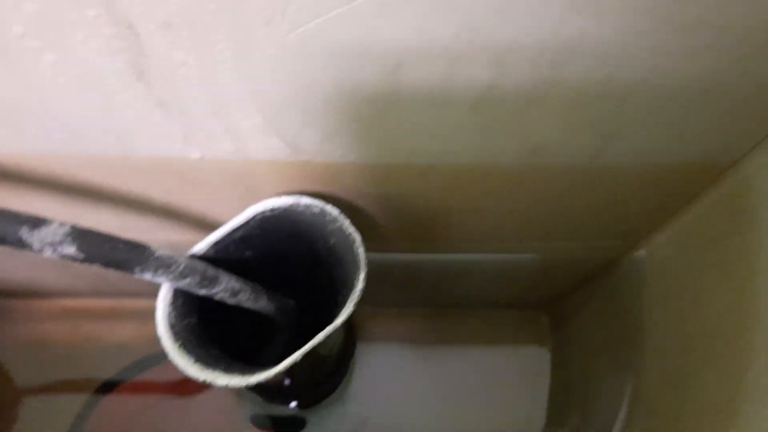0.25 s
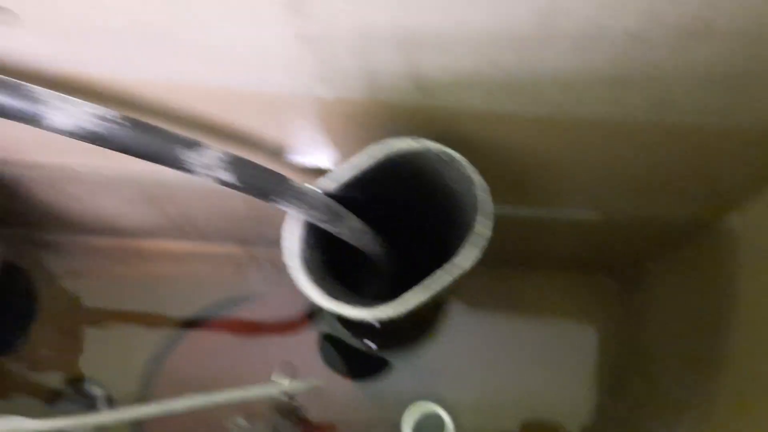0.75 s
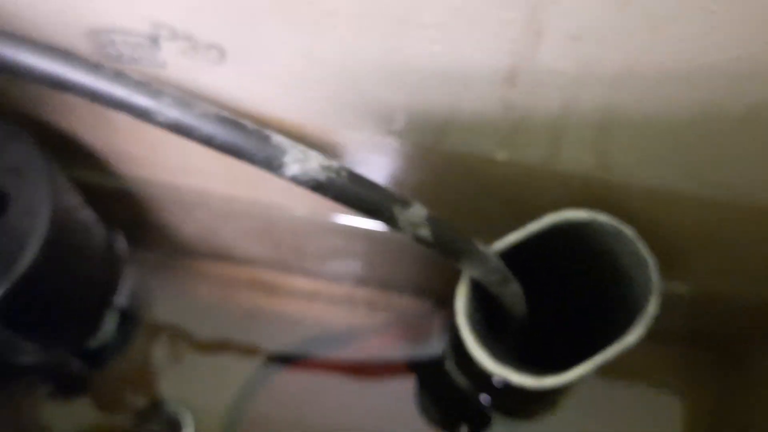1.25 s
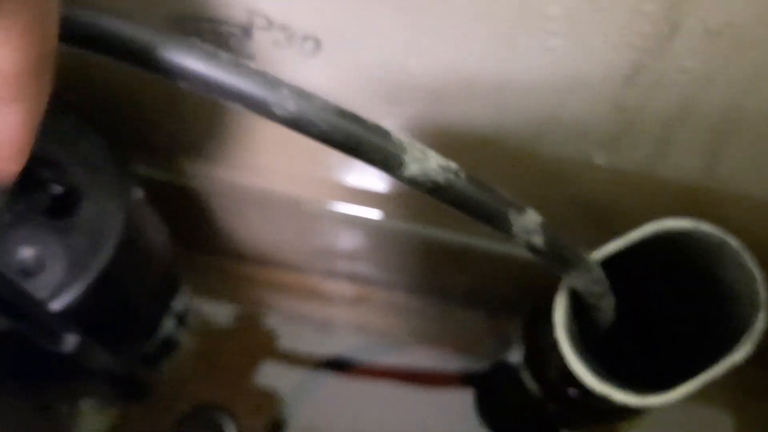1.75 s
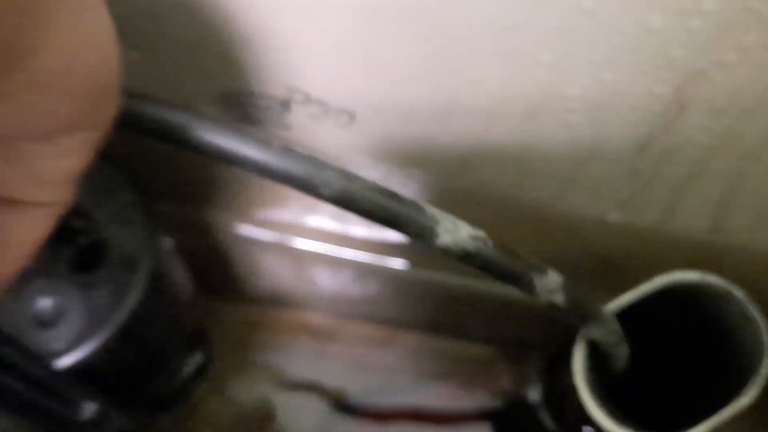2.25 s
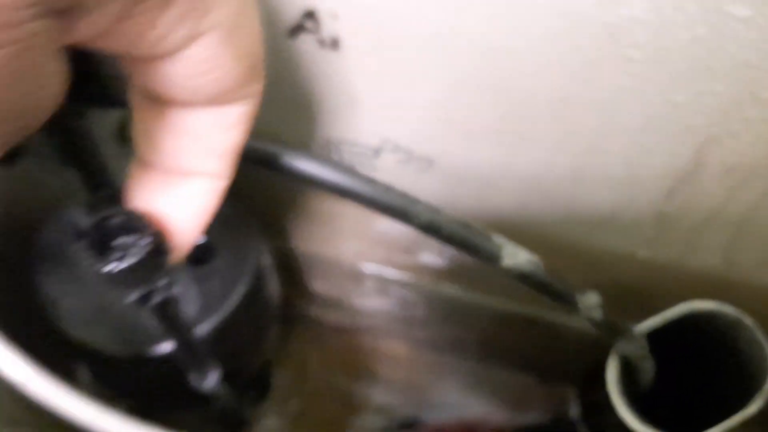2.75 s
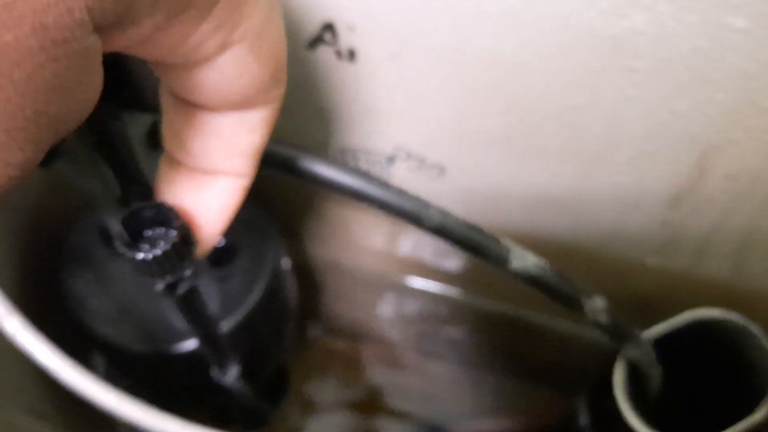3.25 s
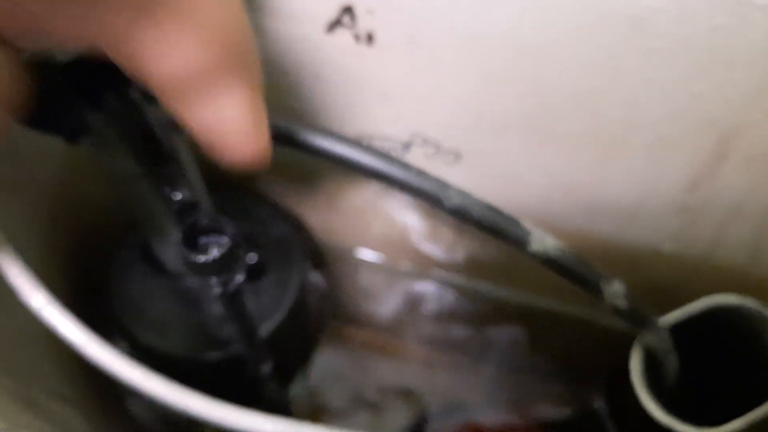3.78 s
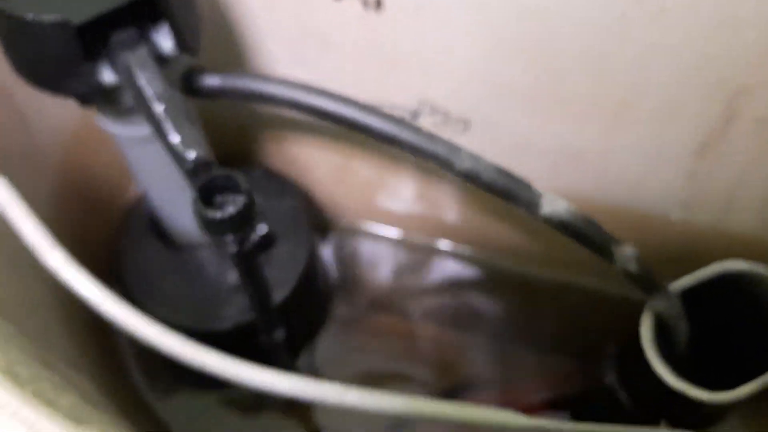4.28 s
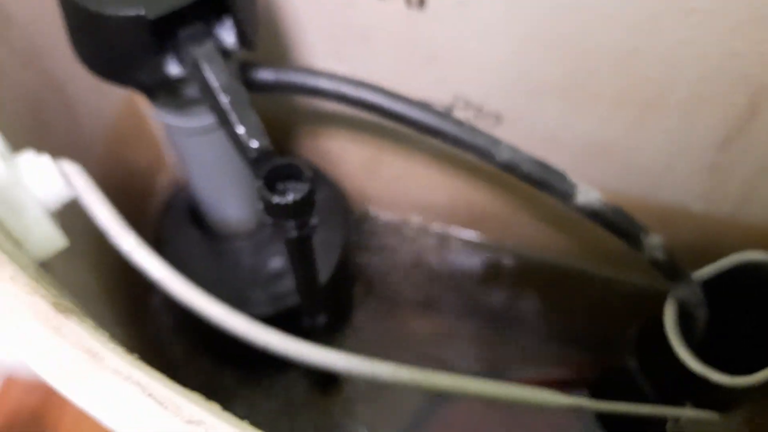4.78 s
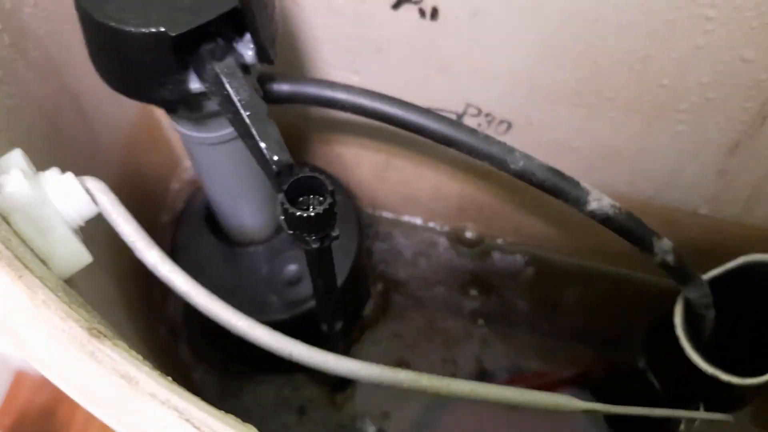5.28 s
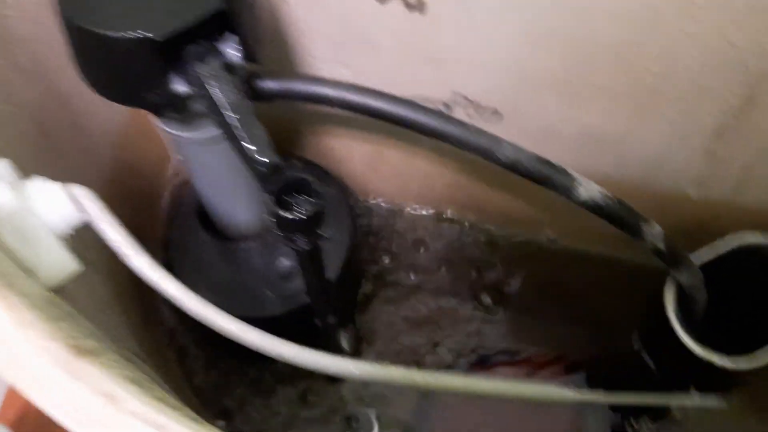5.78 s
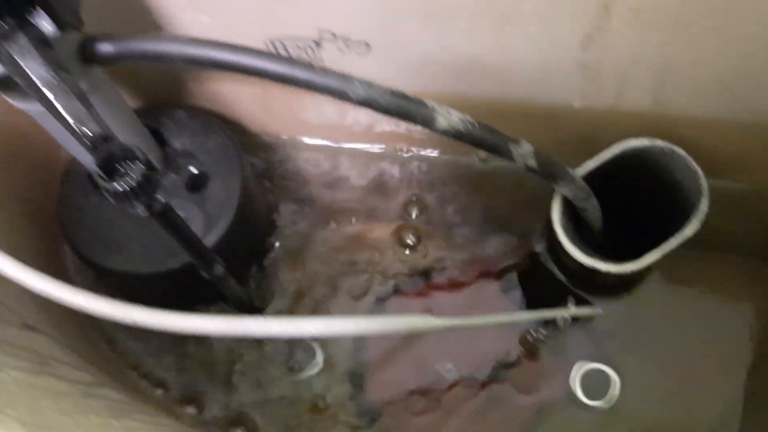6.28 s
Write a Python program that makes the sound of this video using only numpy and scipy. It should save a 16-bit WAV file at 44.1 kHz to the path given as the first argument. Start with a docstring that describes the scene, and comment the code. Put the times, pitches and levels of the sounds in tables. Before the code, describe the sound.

Close inside a refilling toilet cistern: steady rush, finger bumps, valve rasping shut, sparse plinks, then a spit, knocks and a stronger bubbling rush.

```python
"""A small bathroom, an open toilet tank refilling, a two-port hand-held microphone just above the water.
The fill valve hisses and spits as shaped noise; its jet churns bubbles that ring the air modes of the tank.
A finger brushes the left port as pressure snaps and rubbed noise. Then a hand lifts the float: the valve
sings in narrow noise bands, shuts and drips as short decaying tones, and on release it spurts, glugs
and rushes on more strongly."""
import sys
import numpy as np
from scipy import signal
from scipy.fft import rfft, irfft
from scipy.io import wavfile
from scipy.ndimage import uniform_filter1d, minimum_filter1d, map_coordinates

SR = 44100
rng = np.random.default_rng(int(sys.argv[2]) if len(sys.argv) > 2 else 0)


def store_pcm(level_fs):
    """Save levels as 16-bit WAV."""
    pcm = np.round(np.clip(level_fs, -1, 1) * 32767).astype(np.int16)
    wavfile.write(sys.argv[1], SR, np.atleast_2d(pcm).T)


N = 287973
TIME = np.arange(N) / SR
FREQ = np.maximum(np.arange(N // 2 + 1) * SR / N, 1)
# Levels in the tables are relative: the functions that play them may add trims.


def undb(db):
    """Decibels to gain."""
    return 10 ** (np.asarray(db) / 20)


def shape(x, response):
    """Filter by a frequency response."""
    return irfft(rfft(x) * response, N)


def unit(x, lo=1, hi=SR):
    """Scale so that the band from lo to hi [Hz] has rms 1."""
    return x / shape(x, (FREQ >= lo) & (FREQ <= hi)).std()


def low_cut(hz, order):
    """Response that fades below hz."""
    return 1 / (1 + (hz / FREQ) ** order)


def high_cut(hz, order):
    """Response that fades above hz."""
    return 1 / (1 + (FREQ / hz) ** order)


def detuning(hz, width):
    """Distance from a mode's centre, in half widths."""
    return (FREQ / hz - hz / FREQ) * hz / width


def resonance(hz, width):
    """Response of one damped mode."""
    return 1 / (1 + 1j * detuning(hz, width))


def body(modes, port=0):
    """Modes add in power; port scales the optional fourth column, positive for the left port."""
    power = 0
    for hz, width, db, *lean in modes:
        power = power + undb(2 * db + port * sum(lean)) / (1 + detuning(hz, width) ** 2)
    return np.sqrt(power)


def add(out, s, sound):
    """Mix a short sound in at time s."""
    i = int(np.clip(s * SR, 0, N - 1))
    out[..., i:i + sound.shape[-1]] += sound[..., :N - i]


def follow(curve, column=1):
    """Read one column of a timed curve at every sample."""
    columns = np.transpose(curve)
    return np.interp(TIME, columns[0], columns[column])


def walk(rate):
    """Slow random wander around 0, drawn afresh rate times a second, with spread near 0.36."""
    hold = max(int(SR / rate), 1)
    steps = np.repeat(rng.standard_normal(N // hold + 1), hold)
    return 0.44 * uniform_filter1d(steps, hold)[:N]


def noise():
    """Unrelated noise for the two ports."""
    return rng.standard_normal((2, N))


def ports(x, apart_hz=900):
    """Long waves reach both ports alike, short ones unrelated."""
    apart = np.minimum(FREQ / apart_hz, 1) ** 1.17
    side = shape(x[1], apart)
    return shape(x[0], np.sqrt(2 - apart ** 2)) + np.array([side, -side])


def bubble(hz, cycles, glide):
    """A bubble decays by 1/e in some cycles; its pitch climbs as it nears the surface."""
    age = np.arange(int(5 * cycles / hz * SR) + 2) * hz / SR / cycles
    return np.exp(-age) * np.sin(2 * np.pi * cycles * (age + glide * age ** 2 / 2))


def bubbles(lo_hz, hi_hz, cycles, spread_db, count, glide=0.028):
    """A swarm of bubbles of all sizes, each at its own place."""
    out = np.zeros((2, N))
    for when, size, loud, place in rng.random((count, 4)):
        gain = undb(-spread_db * np.log(.02 + .98 * loud))
        ears = np.array([[np.cos(2 * np.pi * place)], [np.sin(2 * np.pi * place)]])
        hz = lo_hz * (hi_hz / lo_hz) ** size
        add(out, when * N / SR, gain * ears * bubble(hz, cycles, glide))
    return unit(out)


def bursts(rows, source):
    """Short swells of band noise that peak a quarter of the way in and fall slowly."""
    out = np.zeros_like(source)
    for s, length, db, hz, width in rows:
        age = np.maximum(TIME - s, 0) / (length / 4)
        band = unit(shape(source, np.abs(resonance(hz, width)) ** 2))
        out += undb(db) * age * np.exp(1 - age) * band
    return out


def swell(start, end, rise_db_per_s, fall_db_per_s):
    """Gain that rises to 1 at start, holds until end and dies away."""
    before, after = np.maximum(start - TIME, 0), np.maximum(TIME - end, 0)
    return undb(-rise_db_per_s * before - fall_db_per_s * after)


def gliding(curve, width_hz):
    """A noisy resonance whose level and centre follow a curve."""
    turn = 2 * np.pi * np.cumsum(follow(curve, 2)) / SR
    a, b = (shape(noise(), high_cut(width_hz / 2, 4)) for _ in range(2))
    band = unit(a * np.cos(turn) + b * np.sin(turn))
    return band * undb(follow(curve)) * swell(curve[0][0], curve[-1][0], 300, 300)


def drift(x, share=0.00895, rate=5):
    """Resonances wander a little in pitch as the hand-held microphone moves."""
    at = np.cumsum(1 + share * walk(rate))
    return np.array([map_coordinates(ear, [at], order=3, mode="mirror") for ear in x])


def walls(x, t60=0.16, wet_db=-5):
    """Close porcelain walls scatter each small sound into a short decaying tail."""
    t = TIME[:SR // 3]
    tail = rng.standard_normal((2, len(t))) * undb(-60 * t / t60)
    tail *= undb(wet_db) / np.sqrt(np.sum(tail[0] ** 2))
    return x + signal.fftconvolve(x, tail, axes=1)[:, :N]


def settle(db, fall_db_per_s):
    """Water follows a rising drive at once, but calms only at its own pace."""
    calming = fall_db_per_s * TIME
    return np.maximum.accumulate(db + calming) - calming


# Flow: the valve runs, shuts to a dwindling leak, reopens part way, then fully: (time [s], level [dB])
VALVE_FLOW = [(0, -36.5), (0.9, -36), (2.05, -35), (2.35, -33), (2.73, -34.5), (2.80, -46), (2.87, -54),
              (3.48, -72.5), (3.54, -56), (3.585, -49), (3.61, -40), (3.68, -42.5), (3.74, -37.5),
              (3.82, -37), (3.92, -30.5), (4.7, -31), (6.5, -32.5)]
# How hard the jet stirs the water, relative to the flow: (time [s], level [dB])
JET_STIR = [(0, -3.5), (0.7, -3), (1.05, -8.5), (2.05, -7.5), (2.55, -4.5), (3.62, 0), (3.85, -3.5),
            (3.97, -1), (4.4, -0.5), (5.1, 2), (5.5, -3), (6.5, -3.5)]


def water_levels(churn_fall_db_per_s=59, slosh_fall_db_per_s=16, slosh_per_stir=0.99):
    """Levels [dB] of jet, churning and slosh, driven by the flow; churning calms fast, deep slosh slowly."""
    flow, stir = follow(VALVE_FLOW), follow(JET_STIR)
    churn = settle(flow + stir, churn_fall_db_per_s)
    slosh = settle(flow + slosh_per_stir * stir, slosh_fall_db_per_s)
    return flow, churn, slosh


# Resonances of the valve's hiss, before and after the handover: (centre [Hz], width [Hz], level [dB])
FIRST_HISS_MODES = [(3130, 630, -4), (3910, 130, -2.5), (4650, 130, -5.5), (5280, 220, -2),
                    (6280, 320, -0.5), (7000, 480, -4), (7870, 490, 0), (8750, 230, -0.5),
                    (10610, 560, -3.5), (11850, 560, 0), (12840, 800, -0.5), (14400, 710, 0),
                    (15040, 810, 3)]
SECOND_HISS_MODES = [(2810, 770, 1), (3610, 390, -1), (4660, 370, -5.5), (5680, 1900, -3.5),
                     (6740, 750, -2.5), (7930, 630, -2.5), (8760, 230, -1), (10820, 570, -6),
                     (12060, 540, -3), (12760, 680, 1), (14300, 990, -3.5), (14970, 1240, 0.5)]


def spray(modes, crackle_db, flutter_db, tilt_db, count):
    """The valve's jet: hiss that flutters and crackles, shaped by the valve's passages and near walls."""
    snaps = np.zeros(N)
    when, size = rng.random((count, 2)).T
    snaps[(when * N).astype(int)] = (.01 + size) ** -.9
    burst = signal.lfilter([1], [1, -np.exp(-1 / (0.00058 * SR))], snaps)  # each snap decays in 0.58 ms
    crackle = shape(noise() * np.sqrt(burst / burst.mean()), np.minimum(FREQ / 12000, 1) ** 0.3)
    jet = walls(noise() + undb(crackle_db) * crackle, t60=.09, wet_db=-6)
    # the top octave beams toward the right port
    beam = undb(np.array([[-.5], [.5]]) * tilt_db * np.minimum(FREQ / 13000, 1) ** 2)
    fluttering = jet * undb(flutter_db * walk(45))
    hiss = shape(fluttering, body(modes) * beam * low_cut(1800, 6))
    return unit(drift(hiss, share=.015), 5000, 15500)


# Lowest air modes of the tank: (centre [Hz], width [Hz], level [dB])
CAVITY_MODES = [(234.4, 9, -9), (267.8, 5.9, -6), (299.9, 5.2, -2), (321, 19, -4), (324.5, 24, -8),
                (367.3, 5.4, 4.5)]
# Higher air modes, before and after the handover:
# (centre [Hz], width [Hz], level [dB], lean to the left port [dB, scaled by the port factor])
FIRST_AIR_MODES = [(454, 9.3, -3.5, 23), (524, 5.8, -3, -7), (547, 8.4, -9, -8), (585, 28, -5, 18),
                   (651.6, 19, -3.5, -11), (725, 150, -17.5, 5), (900, 37, -7, 8), (965, 8.4, 4, 0),
                   (1070, 8.3, -16, -17), (1163, 42, -6.5, -3.5), (1272, 18, -3, 16.5),
                   (1325, 110, -10.5, -7.5), (1695, 144, -4, 7), (1625, 35, -4.5, -12.5),
                   (1945, 20, 1.5, -10), (2010, 24, -2.5, 13), (2110, 58, 2, -2.5), (2334, 80, 0, -0.5),
                   (2590, 140, -7, 5), (2840, 160, -7.5, 12), (3270, 24, -3.5, 10)]
SECOND_AIR_MODES = [(443, 25, -14, 19), (462, 13, -3, 21), (545, 11.5, -6, 28), (592, 31, -7, -15.5),
                    (656, 5.9, -4.5, 8), (684, 6.3, -0.5, 21), (745, 14, -36, -8), (854, 14, -12, -12),
                    (906.5, 6.7, 1.5, 13.5), (930, 15, 3, -2), (991, 7.5, 5.5, 6.5), (1140, 44, -6, -7),
                    (1230, 45, -15, -1), (1228, 36, -0.5, 7.5), (1283, 16, -1, 3), (1337, 28, 3, -7.5),
                    (1440, 36, -8, 8), (1590, 130, -3.5, -6), (1740, 19, 3.5, -10), (1870, 56, -18, -6),
                    (1955, 140, -2, -1), (2089, 67, 0, -9), (2260, 50, -21, -1), (2306, 51, -3.5, 10.5),
                    (2500, 60, -11, 10), (3030, 5000, -17, 12)]


def inflow(levels, hiss, modes, hiss_db, churn_db, slosh_db, bubble_db, surge_db, dulling=0.43):
    """The jet hisses, stirs up small bubbles that ring the higher modes, and heaves the whole cavity."""
    hiss_level, churn_level, slosh_level = undb(levels)
    # a throttled jet is slower and loses its top first
    top = shape(hiss, low_cut(9500, 6))
    hiss = hiss - top * (1 - (hiss_level / hiss_level.max()) ** dulling)

    swarm = bubbles(592.0, 5110, cycles=5.0, spread_db=1.5, count=2600)
    froth = noise() + undb(bubble_db) * unit(np.diff(swarm, prepend=0))
    tank = np.array([body(modes, 0.9), body(modes, -1.6)]) * low_cut(350, 4)
    surging = ports(froth * undb(surge_db * walk(22)))
    churn = unit(drift(shape(surging, tank), share=0.002985))

    slosh = unit(shape(ports(noise()), body(CAVITY_MODES) * np.abs(resonance(345, 390))))
    # the steady jet keeps the heaving from ever dying down for long
    slosh /= np.sqrt(uniform_filter1d(np.mean(slosh ** 2, 0), SR // 12) + 0.6)
    return (hiss * hiss_level * undb(hiss_db) + churn * churn_level * undb(churn_db)
            + slosh * slosh_level * undb(slosh_db))


# Slow swelling and thinning of two bands of the rush: (time [s], middle band [dB], high band [dB])
RUSH_BAND_LEVELS = [(0, 1, -1.5), (.6, -1.5, -7), (.8, -0.5, 0), (1.33, 1, -1), (1.85, -2, 1),
                    (2.55, 0.5, 1.5), (3.68, -3.5, -1), (4, 1.5, 2), (5.3, -1.3, -3.5), (6.1, -2, -2.5),
                    (6.28, 0, 2), (6.38, -6, -1), (6.52, 1, 2)]
# Those bands: (centre [Hz], width [Hz])
RUSH_BAND_SHAPES = [(4600, 3700), (10000, 1700)]


def colour_bands(x):
    """Two bands of the rush slowly swell and thin."""
    out = x
    for column, (hz, width) in enumerate(RUSH_BAND_SHAPES, start=1):
        band = shape(x, 1 / (1 + (2 * (FREQ - hz) / width) ** 4))
        out = out + (undb(follow(RUSH_BAND_LEVELS, column)) - 1) * band
    return out


def back_wall(x, wall_path_m=.42, sway_m=.035, wall_db=-13.5):
    """The back wall mirrors the jet and combs it at shifting pitches as the hand-held microphone sways."""
    lag = (wall_path_m + sway_m * walk(2.5)) / 343 * SR  # samples, at 343 m/s
    hiss = shape(x, low_cut(3000, 6))
    sample = np.arange(N)
    mirrored = np.array([np.interp(sample - lag, sample, ear) for ear in hiss])
    return x + undb(wall_db) * mirrored


# Low modes of the small bathroom: (centre [Hz], width [Hz], level [dB])
ROOM_MODES = [(55.8, 11, 2.5), (98.6, 25, 0.5), (120, 12, 4), (174, 27, -7), (194, 35, -7)]


def pipes(slosh_db, rumble_db=-50, rumble_at_db=-41, rumble_per_slosh=0.43, side_db=-9):
    """The supply pipe's rumble stands in the low modes of the room and grows with the moving water."""
    mid, side = unit(shape(noise(), body(ROOM_MODES) * high_cut(300, 4) * low_cut(32, 4)))
    level = undb(rumble_db + rumble_per_slosh * (slosh_db - rumble_at_db))
    return level * (mid + undb(side_db) * np.array([side, -side]))


# What the overflow pipe rings with: (centre [Hz], width [Hz], level [dB])
OVERFLOW_PIPE_MODES = [(120, 380, 3), (633, 110, -4.5), (3060, 600, 3)]


def overflow(until_s=0.77, level_db=-41, fall_db_per_s=30):
    """The refill hose's thin stream rings the overflow pipe, fading once the microphone turns away."""
    stream = ports(noise())
    ringing = 0
    for hz, width, db in OVERFLOW_PIPE_MODES:
        ringing = ringing + undb(db) * unit(shape(stream, np.abs(resonance(hz, width)) ** 2))
    return undb(level_db) * unit(ringing) * swell(0, until_s, 0, fall_db_per_s)


# Brief swells of band noise: gushes, splashes, rough drips, ticks, a valve note
# and low bumps of the hand on the float:
# (time [s], length [s], level [dB], centre [Hz], width before squaring [Hz])
NOISE_SWELLS = [(0.105, 0.064, -37, 647, 90), (1.32, .04, -44, 4050, 400), (1.472, .02, -32, 14500, 3000),
                (2.505, .04, -34, 10800, 900), (2.70, 0.3, -35.5, 105, 79.6), (2.75, 0.21, -39, 282, 234),
                (2.77, 0.076, -42, 990, 70), (2.8, 0.024, -41, 2570, 700), (2.94, 0.056, -48, 2150, 250),
                 (3.141, 0.052, -45, 2110, 450), (3.148, 0.06, -54, 1330, 101),
                (3.384, .035, -59, 1320, 140), (3.557, 0.051, -32, 2460, 3000),
                (3.5635, 0.0092, -27.5, 5700, 1500), (3.565, 0.04, -37, 950, 69.5),
                (3.598, 0.043, -30.5, 13300, 6000), (3.59, .08, -43, 2070, 260),
                (3.606, .035, -37, 8250, 250), (3.622, 0.03, -35.5, 6860, 2000),
                (3.708, 0.077, -39.5, 690, 100), (3.846, 0.02, -31.5, 4800, 1100),
                (3.906, 0.023, -28.5, 4160, 1500), (3.93, 0.095, -33, 2900, 2200),
                (4.42, 0.035, -29, 191, 200), (5.09, 0.04, -35.5, 570, 90)]


def noise_swells():
    """Gushes, splashes, rough drips, ticks, a valve note and low hand bumps, each a brief swell of band noise."""
    return bursts(NOISE_SWELLS, ports(noise()))


# A finger rubs the left port: (time [s], length [s], level [dB], centre [Hz], width before squaring [Hz])
FINGER_RUBS = [(.707, 0.046, -29, 2270, 2950), (.709, 0.079, -31.5, 297, 600),
               (.7135, 0.0046, -34, 3150, 1500), (.7235, .002, -30, 5500, 4000),
               (.735, 0.19, -35, 2900, 3000), (.7545, .002, -29, 4500, 5000), (.744, 0.023, -23, 80, 70),
               (.751, 0.005, -29, 350, 700), (.896, 0.066, -27, 800, 1800), (.903, 0.0021, -37, 4460, 4000),
               (.9175, 0.0026, -31, 4500, 4000), (.9145, 0.0017, -29, 6000, 10000),
               (.93, 0.026, -18, 68, 50)]
# It sticks and snaps off the port:
# (time [s], level [dB], push length [s], rebound length [s], share of port ring [ratio])
FINGER_SNAPS = [(0.7092, -3.5, 0.00007, 0.000089, 0.14), (0.7995, 5, 0.00018, 0.00021, 0.39),
                (0.7996, -13, 0.00005, 0.00005, 0.27), (0.8002, -6.5, 0.00035, 0.00057, 1.6),
                (0.9155, -5, 0.000043, 0.000059, 0), (0.9157, -8, 0.000059, 0.0005, 0.45),
                (0.93, 10, 0.0001, 0.00053, 0.28)]


def finger(port_hz=320, port_s=0.0047, leak_hz=110, rebound=0.8):
    """Skin rubs and snaps off the left port: sharp suction, slower rebound, a ring as the pressure leaks."""
    out, t = np.zeros(N), TIME[:SR // 20]
    for s, db, push, recover, share in FINGER_SNAPS:
        suction = -np.exp(-(t / push - 2) ** 2)
        after = np.maximum(t - 3 * push, 0)
        swing = rebound * np.sqrt(push / recover) * after / recover * np.exp(1 - after / recover)
        ring = share * np.exp(-after / port_s) * np.sin(2 * np.pi * port_hz * after)
        add(out, s - 2 * push, undb(db) * (suction + swing + ring))
    snaps = shape(out, high_cut(6500, 6) / (1 + leak_hz / (1j * FREQ)))
    rubs = bursts(FINGER_RUBS, noise()[0] * undb(2.2 * walk(400)))
    return np.array([snaps + rubs, np.zeros(N)])


# Narrow noise notes of the valve as it runs, is throttled, reopens and rushes on:
# (start [s], end [s], level [dB], pitch [Hz], width before squaring [Hz])
VALVE_NOTES = [(1.115, 1.852, -47.5, 1621, 58), (1.5, 2.15, -48, 2090, 170), (2.274, 2.65, -37, 1278, 103),
               (2.293, 2.488, -47, 844, 50), (3.72, 3.78, -43, 2056, 170), (3.79, 4.07, -36.5, 2107, 100),
               (5.84, 5.9, -38.5, 6780, 250.2)]
# Rasp of the seal, sliding down as the valve is squeezed shut: (time [s], level [dB], centre [Hz])
CLOSING_RASP = [(2.38, -62, 2700), (2.46, -39, 2380), (2.56, -47, 2280), (2.62, -50, 1900),
                (2.68, -33, 1780), (2.75, -44, 1600), (2.775, -29.5, 1202), (2.8, -56, 1005)]
# Thin whistle, sliding down as the valve opens again: (time [s], level [dB], pitch [Hz])
OPENING_WHISTLE = [(3.68, -52, 12100), (3.71, -44, 11700), (3.735, -45, 10800), (3.76, -52, 10600)]


def valve_song(rise_db_per_s=252, fall_db_per_s=125, needs_flow_db=-35.5):
    """Water squeezed past the seal sings noisy notes, joined by a sliding rasp and whistle as the seal moves."""
    held = 0
    for start, end, db, hz, width in VALVE_NOTES:
        note = unit(shape(noise(), resonance(hz, width) ** 2))
        held = held + undb(db) * swell(start, end, rise_db_per_s, fall_db_per_s) * note
    # below needs_flow_db the held notes fade with the flow
    flowing = np.minimum(undb(water_levels()[0] - needs_flow_db), 1)
    rasp = gliding(CLOSING_RASP, width_hz=620) * undb(1.8 * walk(60))
    whistle = gliding(OPENING_WHISTLE, width_hz=350)
    return held * flowing + rasp + whistle


def gurgle(churn_db, gurgle_db=-14):
    """Larger bubbles at the surface ring out briefly amid the churning."""
    large = bubbles(596, 2390, cycles=12.0, spread_db=2.5, count=650, glide=0.014)
    return walls(large, t60=0.15, wet_db=-16.5) * undb(churn_db + gurgle_db)


def splashes(churn_db, splash_db=-7.0):
    """The boiling surface slaps and spatters in uneven flurries; each splash rings the tank's air modes."""
    slaps = bubbles(700, 2700, cycles=1.9, spread_db=3, count=1700) * undb(2.3 * walk(14))
    tank = np.array([body(SECOND_AIR_MODES, 1), body(SECOND_AIR_MODES, -0.6)]) * low_cut(500, 6)
    return unit(drift(shape(slaps, tank), share=0.006)) * undb(churn_db + splash_db)


# The clearest drips and lone bubbles: (time [s], level [dB], starting pitch [Hz])
CLEAR_DRIPS = [(2.746, -24, 5230), (2.7662, -25, 7700), (2.769, -33, 5100), (2.812, -32, 7600),
               (2.822, -27, 6200), (2.841, -32, 5060), (2.843, -29, 8800), (2.8744, -22, 8500),
               (2.9273, -32.5, 2605), (2.928, -37, 3730), (2.9662, -36, 5400), (3.0155, -39, 5400),
               (3.1113, -43, 2560), (3.145, -34, 2550), (3.146, -44, 3730), (3.5259, -38, 7700),
               (3.706, -28.5, 4570), (3.775, -29, 1330), (3.851, -25, 4660), (3.911, -23, 4200)]
# The valve spits as it closes and as it cracks open: (time of peak [s], level [dB])
VALVE_SPITS = [(2.745, -19), (2.771, -19), (2.884, -29), (2.966, -34), (2.9797, -34), (3.0664, -33.5),
               (3.226, -37), (3.255, -36), (3.3109, -45), (3.569, -12.5)]


def drips(drip_db=-4, spit_db=-5, cycles=14, spit_s=0.0021, rise_s=0.00057):
    """Drops plink into the water as decaying tones and the seal spits short puffs of noise."""
    out, age = np.zeros((2, N)), TIME[:SR // 20] / spit_s
    for s, db, hz in CLEAR_DRIPS:
        plink = bubble(hz, cycles, 0.016)
        onset = 1 - np.exp(-TIME[:len(plink)] / rise_s)
        add(out, s, undb(db + drip_db + rng.normal(0, 2.0, (2, 1))) * plink * onset)
    for s, db in VALVE_SPITS:
        puff = age * np.exp(-age) * rng.standard_normal((2, len(age)))
        add(out, s - spit_s, undb(db + spit_db) * puff)
    return walls(out)


# What the trickle rings below the valve: (centre [Hz], width [Hz], level [dB])
BELOW_VALVE_MODES = [(487, 76, -4.5), (632, 18, 5), (1284, 90, 2), (2080, 79, -2), (2600, 110, -9),
                     (3700, 230, -22)]


def trickle(start_s=2.755, level_db=-43, rise_db_per_s=328, fall_db_per_s=31,
            tick_db=-12, tick_fall_db_per_s=16):
    """The last water spurts unevenly and rings the space under the valve; ticking droplets stop sooner."""
    spurts = bubbles(380, 5500, cycles=1.5, spread_db=-1.5, count=6000) * undb(3 * walk(29.6))
    ringing = unit(shape(spurts, body(BELOW_VALVE_MODES) * low_cut(400, 4)))
    droplets = walls(bubbles(1880, 6000, cycles=5.5, spread_db=5.0, count=600))
    # the ticks' own fall adds to that of the whole trickle
    ticks = droplets * undb(tick_db) * swell(0, start_s, 0, tick_fall_db_per_s)
    return undb(level_db) * (ringing + ticks) * swell(start_s, start_s, rise_db_per_s, fall_db_per_s)


# Big air pockets break loose: (time [s], peak level [dB], starting pitch [Hz], swell [s])
AIR_GULPS = [(2.96, -37, 317, 0.012), (3.06, -43, 330, .011), (3.222, -42.5, 314, .01),
             (3.343, -35.5, 287, 0.014), (3.388, -44, 309, .014), (3.964, -21.5, 298, .011),
             (4.695, -24.5, 345, 0.011), (4.772, -19.5, 347, 0.014), (4.905, -21, 355, 0.02),
             (4.952, -27, 357, 0.0095), (5.005, -20.5, 354.4, 0.014), (5.044, -19, 339, 0.0088),
             (5.09, -17.5, 345, 0.012), (5.308, -26, 333.2, 0.0091), (5.47, -25.5, 342, 0.012),
             (5.545, -29, 330, 0.013)]


def gulps(glide=0.15):
    """Large bubbles swell and die away in a few cycles, rising slightly in pitch."""
    out, t = np.zeros(N), TIME[:SR // 10]
    for s, db, hz, swell_s in AIR_GULPS:
        envelope = (t / swell_s * np.exp(1 - t / swell_s)) ** 2
        add(out, s, undb(db) * envelope * np.sin(2 * np.pi * hz * t * (1 + glide * t)))
    return out


# The float arm and water column knock the tank: (time [s], level [dB], share of long ring [0-1])
TANK_KNOCKS = [(3.563, -17.5, 0), (3.794, -11.5, 0.74)]
# The tank's dull thud and its long ring: (pitch [Hz], level [dB], 60 dB decay [s])
THUD_MODES = [(319, 3.5, 0.077), (380, -8.5, 0.095), (514, -24, 0.077), (670, -33.5, 0.055)]
RING_MODES = [(465, -10, 0.29), (648, -17.5, 0.38)]


def knocks(low_hz=210, contact_s=0.0025):
    """A dull thud of the tank, with a thin ring after it where the knock has a share of it."""
    out, t = np.zeros(N), TIME[:SR // 2]

    def struck(modes):
        """Sum of decaying tones."""
        return sum(undb(db - 60 * t / t60) * np.sin(2 * np.pi * hz * t) for hz, db, t60 in modes)

    thud, ring = struck(THUD_MODES), struck(RING_MODES)
    for s, db, share in TANK_KNOCKS:
        add(out, s, undb(db) * (thud + share * ring) * (1 - np.exp(-t / contact_s)))
    return shape(out, 1 / (1 + low_hz / (1j * FREQ)) ** 2)


# The air in the tank hums, louder and higher as the stirring peaks: (time [s], level [dB], pitch [Hz])
AIR_HUM = [(3.85, -41, 303), (3.97, -34, 303), (4.3, -40.5, 313.7), (4.55, -36, 338), (4.8, -30, 355.8),
           (5.08, -32.5, 361.3), (5.25, -33.5, 351), (5.45, -44, 325.4), (5.9, -38.5, 331.4),
           (6.2, -39, 355), (6.5, -53, 354.3)]


def tank_hum(steady=0.22, width_hz=23):
    """The tank's air wavers around one drifting pitch, alike at both ports; the jet keeps it sounding."""
    hum = gliding(AIR_HUM, width_hz)[0]
    drive = undb(follow(AIR_HUM))
    return hum / np.sqrt(uniform_filter1d((hum / drive) ** 2, SR // 40) + steady)


# Clusters of bubbles break the surface: (time [s], level [dB], pitch [Hz])
BUBBLE_CLUSTERS = [(3.899, -26, 1960), (3.935, -26, 1370), (3.985, -16.5, 2030), (4.015, -27, 2600),
                   (4.05, -19, 2150), (4.054, -20, 1346), (4.123, -23, 1700), (4.189, -36, 1350),
                   (4.215, -24, 967), (4.988, -20, 1281), (5.103, -22, 1730), (5.145, -24, 986),
                   (5.355, -22, 1237), (5.498, -30, 1744), (5.632, -34, 1986), (5.68, -28, 985),
                   (5.775, -24, 2030), (5.838, -20, 2073), (5.944, -22, 1770), (6.11, -28, 1813),
                   (6.202, -22, 1720), (6.262, -26, 2050), (6.297, -24, 1760)]


def blubs(blub_db=-4.5, spread_s=0.03, scatter=0.021, cycles=11, fade_db=4, count=4):
    """A few bubbles of like size burst in quick succession, the first the loudest."""
    out = np.zeros((2, N))
    for s, db, hz in BUBBLE_CLUSTERS:
        for k, (late, size, place) in enumerate(rng.random((count, 3))):
            along = (k + late) / count
            ears = np.array([[np.cos(place * np.pi / 2)], [np.sin(place * np.pi / 2)]])
            blub = bubble(hz * (1 + scatter * (2 * size - 1)), cycles, 0.0068)
            add(out, s + spread_s * along, undb(db + blub_db - fade_db * along) * ears * blub)
    return walls(out, t60=0.23, wet_db=-8)


# The microphone comes over the valve: (start [s], end [s])
HANDOVER_SPAN = (2.72, 2.82)


def scene():
    """The inflow changes colour as the hand takes the float and the microphone comes over the valve."""
    handover = np.interp(TIME, HANDOVER_SPAN, [0, 1])
    levels = water_levels()
    _, churn, slosh = levels
    first_jet = spray(FIRST_HISS_MODES, crackle_db=-4.0, flutter_db=3.0, tilt_db=2.5, count=2200)
    second_jet = spray(SECOND_HISS_MODES, crackle_db=-5.5, flutter_db=2.16, tilt_db=3.0, count=2200)
    first = inflow(levels, first_jet, FIRST_AIR_MODES, hiss_db=1.3, churn_db=1.5, slosh_db=2.5,
                   bubble_db=-16.0, surge_db=1.5)
    second = inflow(levels, second_jet, SECOND_AIR_MODES, hiss_db=1.5, churn_db=-1.0, slosh_db=-0.5,
                    bubble_db=-11, surge_db=1.5)
    second = second + gurgle(churn) + splashes(churn) + tank_hum()
    water = np.sqrt(1 - handover) * first + np.sqrt(handover) * second
    rush = colour_bands(back_wall(water))
    return (rush + pipes(slosh) + overflow() + noise_swells() + finger() + valve_song()
            + drips() + trickle() + gulps() + knocks() + blubs())


def limiter(x, ceiling=0.84, ahead_s=0.0063, release_s=0.03):
    """Both channels duck just ahead of an overload and recover slowly."""
    over = np.log(np.maximum(np.abs(x).max(0) / ceiling, 1))
    ahead = -minimum_filter1d(-over, 2 * int(ahead_s * SR) + 1)
    fade = np.exp(-TIME / release_s)
    held = np.maximum.accumulate(ahead / fade) * fade
    return x * np.exp(-uniform_filter1d(held, size=64))


def record(dry, top_hz=15900):
    """The phone limits the peaks and cuts the top."""
    top_cut = signal.ellip(12, .2, 80, top_hz, fs=SR, output="sos")
    return signal.sosfilt(top_cut, limiter(dry))


dry = scene()
out = record(dry)
store_pcm(out)
```